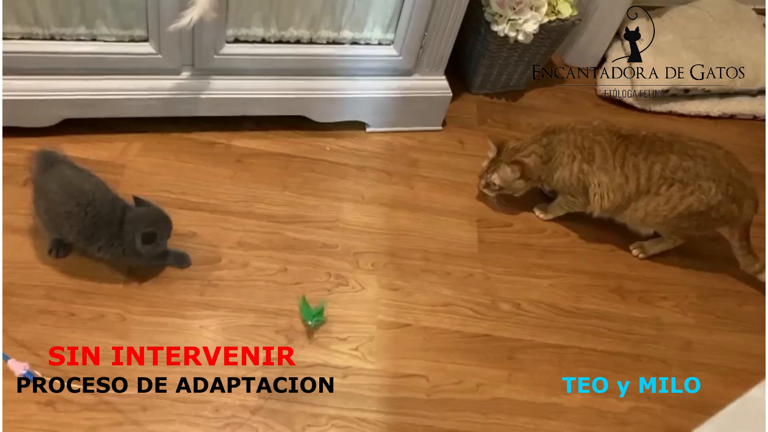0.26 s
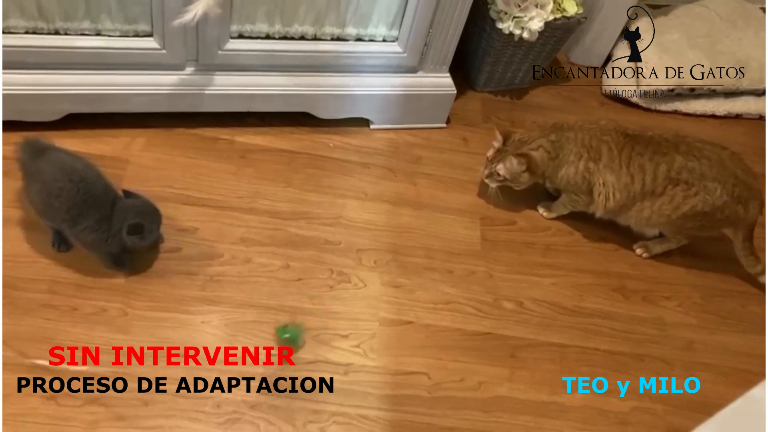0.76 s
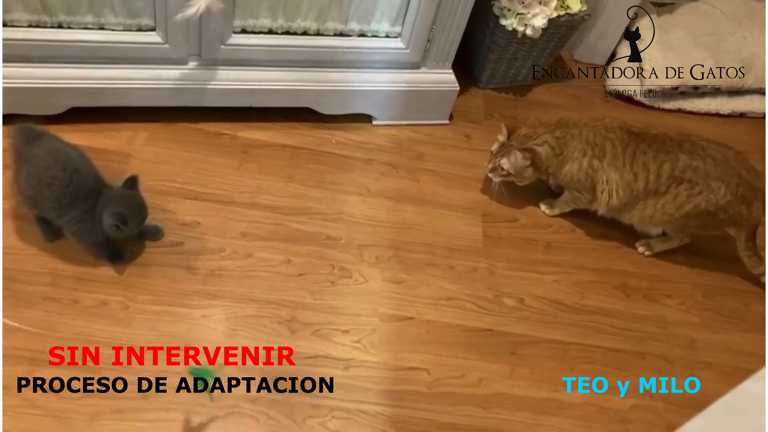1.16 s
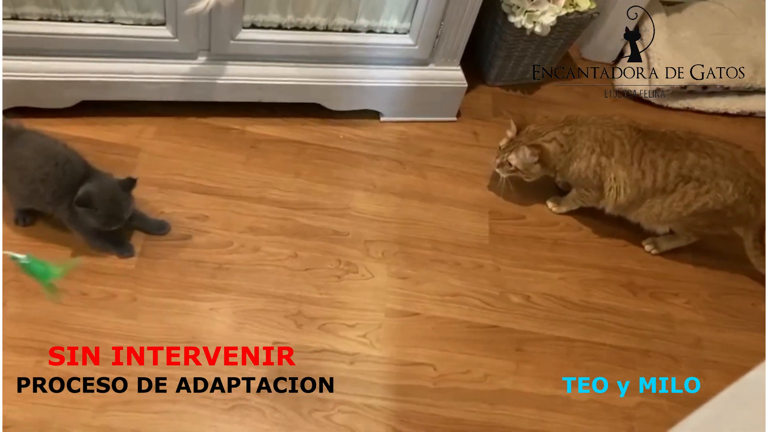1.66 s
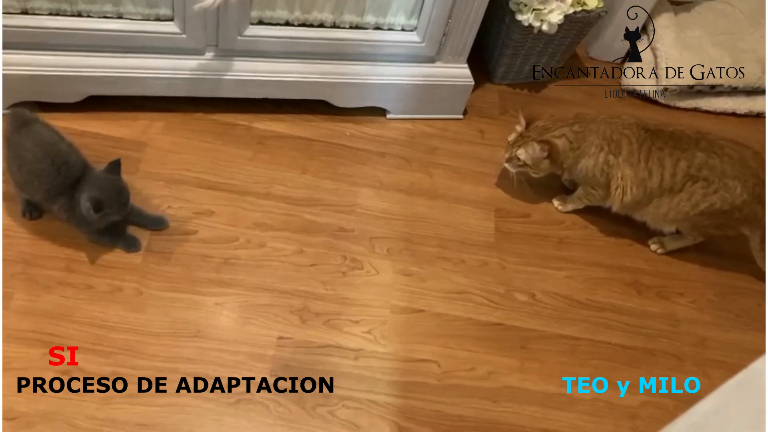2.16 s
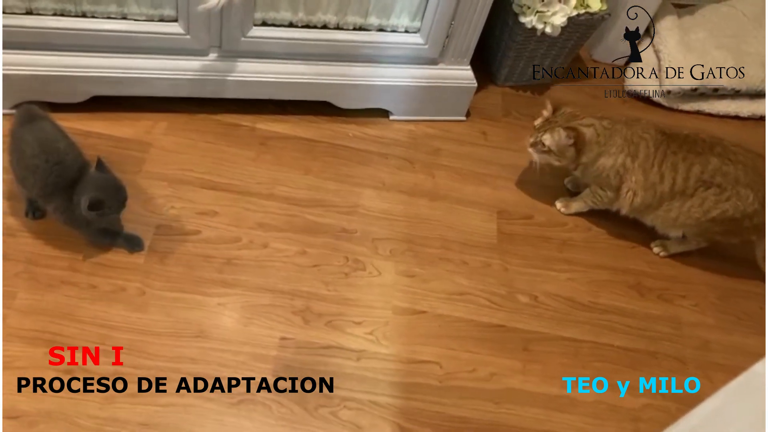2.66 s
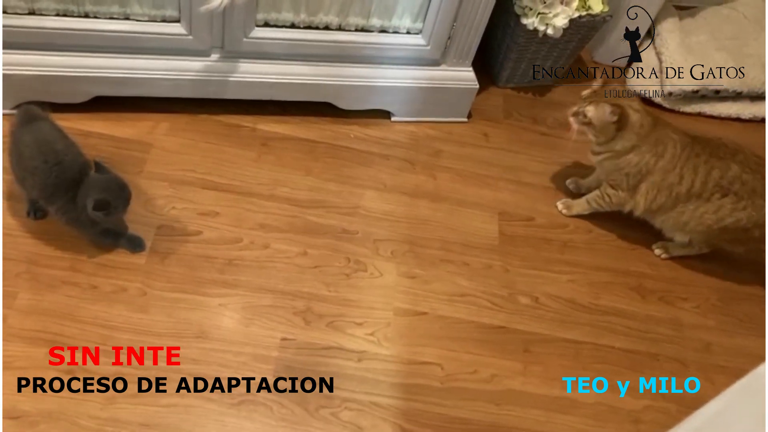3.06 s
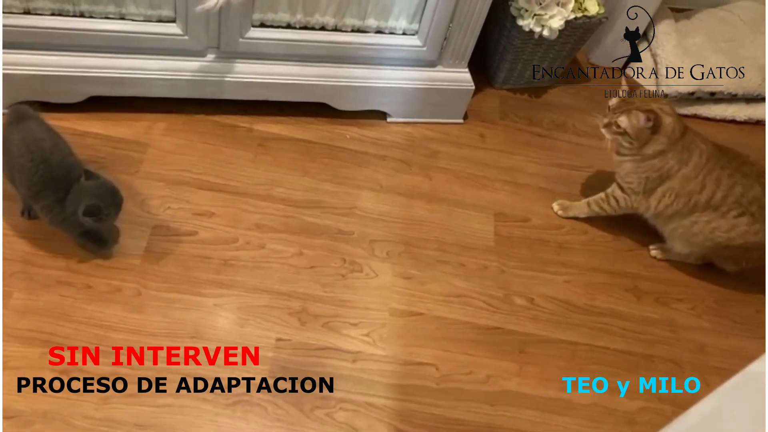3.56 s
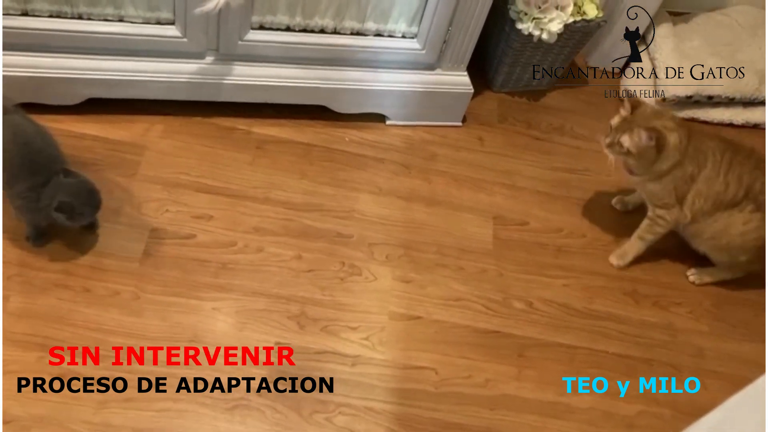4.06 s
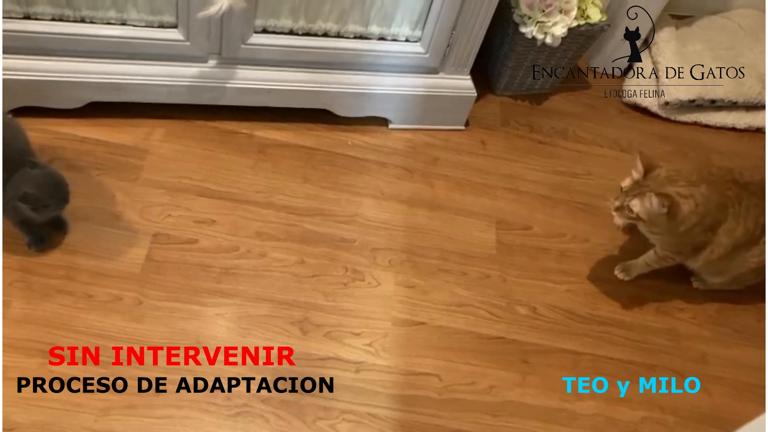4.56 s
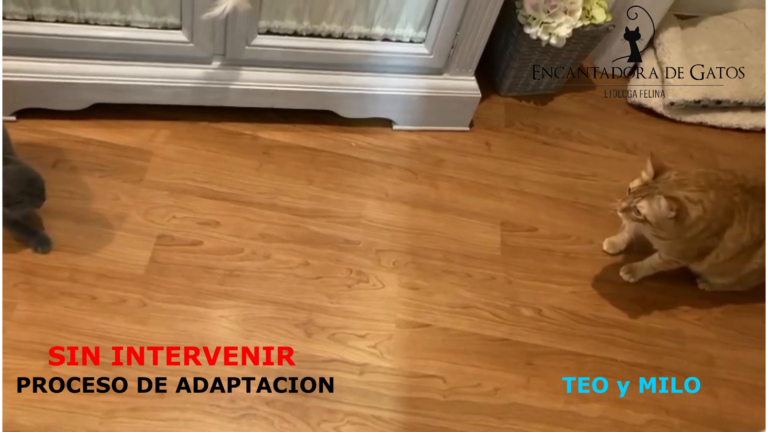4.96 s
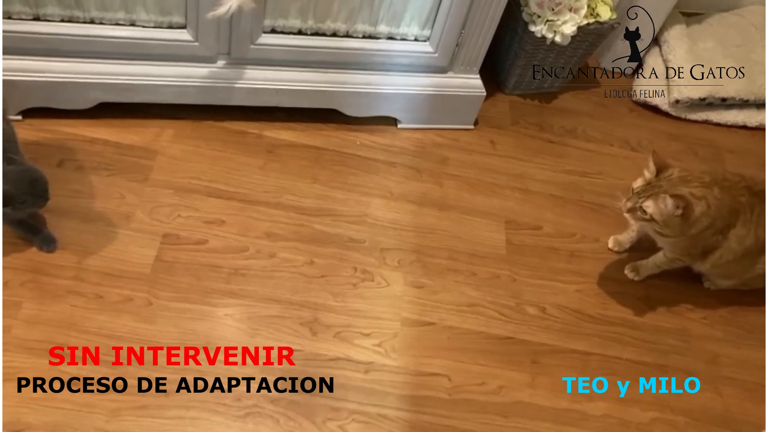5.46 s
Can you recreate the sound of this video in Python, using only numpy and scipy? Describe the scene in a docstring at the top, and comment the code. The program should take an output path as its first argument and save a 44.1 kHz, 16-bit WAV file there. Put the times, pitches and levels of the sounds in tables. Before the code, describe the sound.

Two cats confront each other indoors, heard from a few metres in stereo with a short room ring. One, slightly right of centre, gives a rising and falling yowl, pauses, then yowls again until the end. Between and beneath, the other growls deep and choppy in the centre, with two breathy snarls. Light paw scuffs, ticks and muffled footfalls sit over a quiet appliance hum and dull air noise.

```python
"""A cat gives two drawn-out warning yowls, a few metres from a stereo microphone in a wooden-floored room.
Its folds vibrate almost purely, and turn hoarse when slack, strained or gliding fast. A second cat, facing it,
keeps up a low growl, a buzz chopped by a flutter, and snarls twice, in puffs of air that ring the mouth.
Short noise bursts make the paw scuffs and ticks on the boards, decaying low tones the footfalls.
Behind them an appliance hums as wavering tones over a soft noise rush, and the room rings briefly."""
import sys
import numpy as np
from scipy import signal
from scipy.fft import rfft, irfft
from scipy.io import wavfile
from scipy.ndimage import uniform_filter1d, map_coordinates

SR = 44100
rng = np.random.default_rng(int(sys.argv[2]) if len(sys.argv) > 2 else 0)


def unload_wav(signal):
    """Save mono or channel-first audio to the path in sys.argv[1] as 16-bit WAV at rate SR, clipped to [-1, 1]."""
    wavfile.write(
        sys.argv[1],
        SR,
        np.round(np.clip(np.atleast_2d(signal).T, -1, 1) * 32767).astype(np.int16),
    )


N = 252693
TIME = np.arange(N) / SR
FREQ = np.fft.rfftfreq(N, 1 / SR)
LEFT_RIGHT = np.array([[1], [-1]])

# Source levels below are relative settings, ahead of trims, filters, panning and room.
# tone of the room's rush: (frequency [Hz], density [dB per Hz])
RUSH_TONE = [(20, -21.5), (42, -4), (85, 0.5), (125, 1.5), (200, -3), (380, -4), (600, -12), (1000, -19.5),
             (1600, -27), (2100, -37.5), (2800, -48), (4400, -35), (5500, -53.5), (8500, -37.5),
             (11000, -51)]
# stereo width of the rush: (frequency [Hz], side minus mid [dB])
RUSH_WIDTH = [(60, -18.5), (160, -18), (300, -16.5), (600, 2.5), (2000, -0.5), (4400, -9.5), (9000, -4.5)]
# tones of the appliance: (frequency [Hz], level [dB])
HUM_TONES = [(59.8, -63), (119.6, -66), (160, -67), (552, -74.5), (4382, -99)]
# soft footfalls that shake the floor: (time [s], level [dB])
FLOOR_THUDS = [(0.572, -67), (1.169, -45.5), (1.231, -44)]
# paws scuffing the boards: (time [s], level [dB], centre [Hz], rise [s], t60 [s])
PAW_SCUFFS = [(0.136, -62, 8460, 0.0023, 0.044), (0.583, -65, 8340, 0.0022, 0.17),
              (0.70, -66.5, 8600, 0.0073, 0.073), (3.201, -57.5, 9100, 0.0042, 0.27),
              (3.992, -65.5, 9100, 0.0012, 0.33), (4.07, -71.5, 8840, 0.0097, 0.63),
              (5.007, -64.5, 9480, 0.023, 0.48)]
# small ticks, perhaps claws or the toy: (time [s], level [dB], low mode [Hz], high minus low mode [dB])
SMALL_TICKS = [(2.128, -58.5, 2680, -5), (2.156, -56.5, 2620, -1), (2.184, -57, 2560, -7),
               (2.197, -50.5, 2390, -21), (3.37, -47, 2290, -39)]
# throat resonances of the growl: (frequency [Hz], width [Hz], level [dB])
GROWL_THROAT = [(300.8, 105, 5), (369.4, 30, 4), (940, 290, -20)]
# short growls under the yowls, high and low by turns:
# (start [s], length [s], top pitch [Hz], chest level [dB], throat level [dB])
SHORT_GROWLS = [(0.0, .25, 159.3, -55, -61), (1.532, 0.23, 119.7, -62.5, -72.5),
                (3.628, 0.18, 160.3, -50, -60), (4.534, 0.73, 119.3, -61.5, -68.5),
                (5.076, .65, 167.8, -55, -65.5)]
# the long growl: (time [s], pitch [Hz], chest level [dB], throat level [dB], rasp level [dB])
LONG_GROWL_PATH = [(2.12, 107.4, -67.5, -64.5, -82), (2.25, 115.5, -52.5, -58, -76),
                   (2.39, 117.3, -52, -52, -69), (2.5, 149.9, -50.5, -58, -75.5),
                   (2.62, 167.7, -57, -52, -70), (2.8, 156.2, -48.5, -57, -75.5),
                   (2.9, 144.4, -52, -50.5, -71.5), (3.02, 134.1, -55, -54.5, -72),
                   (3.18, 130.9, -55.5, -59, -68.5), (3.33, 129.6, -64.5, -55.5, -68.5),
                   (3.39, 118.2, -46.5, -54, -69.5), (3.5, 116.1, -47, -52.5, -70),
                   (3.62, 115, -56, -53, -74.5)]
# standing waves between growler and microphone: (frequency [Hz], half width [Hz], gain [dB])
GROWL_STANDING_WAVES = [(131, 18, -6.5), (163.5, 6.8, 5), (261.4, 14, 7), (313, 14, 8)]
# the two snarls: (start [s], rise [s], hold [s], release [s], level [dB],
# resonance scale [ratio], gain of the lower resonance [dB])
SNARL_EVENTS = [(2.183, 0.14, 0.05, 0.18, -63.5, 0.926, 7.5), (5.058, 0.15, 0.18, 0.19, -58, 1.0, 12)]
# mouth resonances of a snarl, ahead of its scale: (frequency [Hz], density [dB per Hz])
SNARL_RESONANCES = [(500, -22), (900, 1), (1300, -4), (1600, -10.5), (1950, 2), (2280, 3), (2440, -13),
                    (2700, -37), (3300, -41.5), (3750, -29), (4400, -15), (4600, -18), (4900, -46),
                    (5500, -54)]
# pitch of the two yowls: (time [s], pitch [Hz])
FIRST_YOWL_PITCH = [(0.1, 303.8), (0.204, 298.1), (0.264, 364), (0.338, 539.5), (0.395, 682), (0.43, 817),
                    (0.465, 847.7), (0.565, 845), (0.598, 748), (0.635, 670), (0.66, 588), (0.786, 545),
                    (0.98, 521.4), (1.076, 509), (1.15, 454.4), (1.234, 429.2), (1.346, 317.8),
                    (1.564, 214.2), (1.66, 199.6)]
SECOND_YOWL_PITCH = [(3.62, 214.4), (3.65, 246.7), (3.715, 288.3), (3.78, 400), (3.85, 512.8), (3.89, 530),
                     (3.94, 586.8), (3.99, 599), (4.05, 574), (4.32, 577.5), (4.67, 466.6), (4.72, 418.5),
                     (4.92, 406.1), (5.17, 430.5), (5.28, 436), (5.45, 496), (5.52, 509.0), (5.73, 489)]
# effort and mouth; the first starts with a catch:
# (time [s], level [dB], mouth opening as overtone gain [dB])
FIRST_YOWL_EFFORT = [(0.102, -68.5, -5.5), (0.124, -45, 1.5), (0.169, -62.5, -9), (.205, -44.5, -0.5),
                     (.27, -49.5, 2.5), (0.324, -51.5, -6.5), (0.364, -39.5, -24), (0.421, -46.5, -34),
                     (.475, -44, -37.5), (.52, -54.5, -27), (.585, -41.5, -36.5), (0.622, -42, -23.5),
                     (0.661, -43.5, -21.5), (.72, -47.5, -4.5), (.83, -58, -15), (.96, -48, -5),
                     (1.03, -55, 7.5), (1.1, -49, -5), (1.189, -37, -15.5), (1.291, -46, 1),
                     (1.4, -51.5, 3), (1.56, -56.5, 1.5), (1.66, -68, 3.5)]
SECOND_YOWL_EFFORT = [(3.62, -63.5, -8), (3.681, -56, -7.5), (3.739, -48.5, -3), (3.8, -45.5, -9.5),
                      (3.888, -51, -10), (3.95, -47, -19.5), (3.992, -47, -22.5), (4.024, -69.5, 6.5),
                      (4.3, -54.5, -2), (4.482, -41, -14.5), (4.56, -46.5, -5.5), (4.64, -46, -6.5),
                      (4.731, -47, 5), (4.87, -45, -5.5), (4.999, -45, 1), (5.128, -54, 6.5),
                      (5.26, -47, -4), (5.391, -54, -1.5), (5.47, -51, -6.5), (5.73, -48, -8.5)]
# upper harmonics: (time [s], level of the third [dB], level of the higher ones [dB])
FIRST_YOWL_UPPER = [(.1, -70.5, -92.5), (.23, -68, -92), (.33, -90, -100), (.58, -100, -105),
                    (.68, -76, -104), (.85, -81, -101), (1.03, -63.5, -98), (1.13, -69.5, -98),
                    (1.25, -74, -86.5), (1.4, -65, -80), (1.55, -62, -90), (1.66, -71, -84)]
SECOND_YOWL_UPPER = [(3.62, -80, -98), (3.729, -75, -92.5), (3.98, -87.5, -104), (4.06, -78.5, -95.5),
                     (4.17, -73.5, -84.5), (4.419, -77.5, -78), (4.53, -75, -85), (4.61, -53.5, -81),
                     (4.749, -66, -80.5), (4.95, -57.5, -86), (5.15, -67.5, -87.5), (5.4, -65.5, -92),
                     (5.55, -73, -98), (5.73, -62, -102)]
# the nearly shut mouth lets little treble out, apart from one resonance: (frequency [Hz], gain [dB])
YOWL_MOUTH = [(1200, 5), (1650, 1.5), (2000, -3.5), (2150, 0.5), (2330, 2), (2480, -5), (2650, -13),
              (2900, -17.5), (3450, -15), (4100, -13), (5000, -25.5)]
# throat rung by the air that rasps through hoarse folds: (frequency [Hz], width [Hz], level [dB])
YOWL_RASP = [(695, 180, -3.5), (1180, 300, -16)]
# standing waves that lift or swallow a yowl's gliding partials:
# (frequency [Hz], half width [Hz], gain [dB])
YOWL_STANDING_WAVES = [(276, 60, 8), (398, 7.5, -2.5), (473, 66, 2), (468.8, 8.4, 6), (502.3, 9.4, -14.5),
                       (565.3, 8.9, -15.5), (598.9, 21, 8), (700.7, 13, 6)]

TOP_HZ = 11000
AIR_DB = -56.5
RIGHT_LAG_S = .00009  # the rush reaches the right microphone this much later
SWELL_BELOW_HZ = 8700  # the rush surges mostly below this; the hiss above it is steadier
TICK_WIDTH_HZ, TICK_HIGH_HZ, TICK_HIGH_WIDTH_HZ = 450, 5520, 370
GROWL_REST_HZ, GROWL_ARCH = 120.2, 1.3
GROWL_CREST = .46  # the pitch tops out at this share of the length
GROWL_ATTACK_S, GROWL_RELEASE_S = 0.041, 0.38
CHEST_SAG_DB_PER_S, THROAT_SAG_DB_PER_S = 14.5, 0.5
GROWL_SWELL_DB = 2.5  # lift of the chest in the middle of a growl; the throat gets half
GROWL_MOUTH_HZ, GROWL_MOUTH_WIDTH_HZ = 926, 380
GROWL_SHIMMER = .18
SNARL_PULSE_HZ, SNARL_PULSE_DEPTH = 110.8, 0.48
SNARL_SHUT_DROP = .08  # share by which the resonances fall when the mouth is shut
EASY_HZ, STRAIN_HZ = 369, 650
PURITY_DB = 6.5  # loss of the second harmonic one octave above the easy pitch
ROUGH_BASE, ROUGH_PER_OCTAVE_DOWN, ROUGH_PER_OCTAVE_UP = 0.12, .6, .45
ROUGH_PER_OCTAVE_PER_S = 0.052
OVERTONE_FLICKER_DB = 2.5
HOARSE_SMEAR = 1.1  # phase wander of the second harmonic when fully hoarse [rad]; the third gets twice this
UPPER_SMEAR = 0.41  # phase wander of the higher harmonics [rad]
YOWL_FLUTTER = .7  # depth of the flutter in a fully hoarse voice
HAZE_HZ, HAZE_WIDTH_HZ = 1840, 1800  # haze of air between the higher harmonics


def undb(db):
    """Decibels to gain."""
    return 10 ** (np.asarray(db) / 20)


def unit(x):
    """Scale to rms 1."""
    return x / np.sqrt(np.mean(x ** 2))


def curves(table):
    """Each column of a time table, sample by sample."""
    s, *columns = np.transpose(table)
    return [np.interp(TIME, s, c) for c in columns]


def gate(table, fade=0.02):
    """Open while a table lasts, with short fades outside it."""
    start, end = table[0][0], table[-1][0]
    return np.interp(TIME, [start - fade, start, end, end + fade], [0, 1, 1, 0])


def colour(x, points):
    """Filter by (frequency [Hz], gain [dB]) points."""
    hz, db = np.transpose(points)
    gain = undb(np.interp(np.log(FREQ + 1), np.log(hz), db))
    return irfft(rfft(x) * gain, N)


def resonate(x, hz, width_hz):
    """A steep resonance: one two-pole band-pass, twice."""
    b, a = signal.iirpeak(min(hz, .45 * SR), hz / width_hz, fs=SR)
    return signal.lfilter(b, a, signal.lfilter(b, a, x))


def walk(rate):
    """Smooth chance of spread 1, moving mostly slower than `rate` [Hz]."""
    spectrum = rfft(rng.standard_normal(N)) * np.exp(-(FREQ / rate) ** 2)
    return unit(irfft(spectrum, N))


def turn(hz):
    """Phase of an oscillator with a moving frequency."""
    return 2 * np.pi * np.cumsum(hz) / SR


def decay(s, rise, t60):
    """Envelope of a touch at time s: a quick rise and an exponential fall."""
    age = np.maximum(TIME - s, 0)
    return (1 - np.exp(-age / rise)) * np.exp(-np.log(1000) * age / t60)


def reflections(x, t60, gap=0.0073):
    """Floor, furniture and walls: a dense, decaying train of echoes of about unit energy."""
    echoes = rng.standard_normal(N) * np.exp(-np.log(1000) * TIME / t60) * (TIME > gap)
    echoes = echoes[:SR] / np.sqrt(np.sum(echoes ** 2))
    return signal.fftconvolve(x, echoes)[:N]


def room(x, t60=0.46, centre_db=-9, wide_db=-2):
    """Direct sound and echoes at the microphone; the echoes are wide except in the bass."""
    width = [(150, -30), (300, -17.0), (420, -12.5), (560, -1.5), (850, -1.5), (1500, 2.0)]
    side = colour(reflections(x, t60), width)
    return x + undb(centre_db) * reflections(x, t60) + undb(wide_db) * side * LEFT_RIGHT


def standing_waves(x, bumps):
    """The room's narrow peaks and dips between a cat and the microphone."""
    freq = np.fft.rfftfreq(2 * N, 1 / SR)
    db = sum(gain_db * np.exp(-((freq - hz) / width) ** 2) for hz, width, gain_db in bumps)
    return irfft(rfft(x, 2 * N) * undb(db))[:N]


def background(hum_waver=0.26, swell_db=2):
    """Wavering appliance tones over the room's soft noise rush, which comes a little from the left."""
    mid = colour(rng.standard_normal(N), RUSH_TONE)
    side = colour(rng.standard_normal(N), RUSH_TONE)
    left, right = mid + colour(side, RUSH_WIDTH) * LEFT_RIGHT
    right = irfft(rfft(right) * np.exp(-2j * np.pi * FREQ * RIGHT_LAG_S), N)
    air = unit(np.array([left, right])) * undb(AIR_DB)
    rush = irfft(rfft(air) / (1 + (FREQ / SWELL_BELOW_HZ) ** 2), N)
    hum = 0
    for hz, db in HUM_TONES:
        tone = np.sqrt(2) * np.sin(turn(hz + 0.61 * walk(3.3)))
        hum = hum + undb(db) * tone * (1 + hum_waver * walk(13.0))
    return air + rush * (undb(swell_db * walk(14)) - 1) + hum


def footfalls(floor_hz=57, rise=0.017, t60=0.4):
    """The boards give a short, deep, decaying thud under a soft footfall."""
    return sum(undb(db) * np.sin(2 * np.pi * floor_hz * (TIME - s)) * decay(s, rise, t60)
               for s, db in FLOOR_THUDS)


def scuffs(width_hz=3000, catch_db=0.5, scuff_db=-9):
    """Pads and claws slide over the boards: bursts of band-passed noise, catching unevenly."""
    rubs = 0
    for s, db, hz, rise, t60 in PAW_SCUFFS:
        rub = unit(resonate(rng.standard_normal(N), hz, width_hz))
        rubs = rubs + undb(db + scuff_db) * decay(s, rise, t60) * rub
    return rubs * undb(catch_db * walk(90))


def ticks(t60=0.027, rise=0.0007, tick_db=-7):
    """Small, hard contacts ring briefly in a low mode; the sharper ones also wake a high mode."""
    contact = rng.standard_normal(N)
    high = unit(resonate(contact, TICK_HIGH_HZ, TICK_HIGH_WIDTH_HZ))
    out = 0
    for s, db, hz, high_db in SMALL_TICKS:
        low = unit(resonate(contact, hz, TICK_WIDTH_HZ))
        out = out + undb(db + tick_db) * (low + undb(high_db) * high) * decay(s, rise, t60)
    return out


def growl(hz, chest_gain, throat_gain, rasp_gain=0, flutter_hz=54, flutter_depth=0.85):
    """Slack folds buzz, chopped by a slower flutter; chest and throat ring and air rasps in the mouth."""
    beat = np.cos(turn(flutter_hz * (1 + .045 * walk(30))))
    # each beat of the flutter tightens the folds: louder and a little higher
    phase = turn(hz * (1 + .012 * walk(70) + .15 * beat))
    buzz = sum(np.cos(k * phase) / k for k in range(1, 11)) + .15 * walk(1200)
    puffs = np.exp(flutter_depth * beat + GROWL_SHIMMER * walk(60))
    chest = unit(resonate(buzz * puffs, 137.8, 64))
    throat = unit(sum(undb(db) * resonate(buzz * puffs, f, width) for f, width, db in GROWL_THROAT))
    air = puffs * (1 + np.cos(phase)) * rng.standard_normal(N)
    rasp = unit(resonate(air, GROWL_MOUTH_HZ, GROWL_MOUTH_WIDTH_HZ))
    return chest_gain * chest + throat_gain * throat + rasp_gain * rasp


def growl_controls():
    """Pitch, chest gain and throat gain: each short growl swells, arches up in pitch and sinks as it tires."""
    hz, chest, throat = GROWL_REST_HZ, 0, 0
    for start, length, top_hz, chest_db, throat_db in SHORT_GROWLS:
        age = np.maximum(TIME - start, 0)
        attack = np.clip(age / GROWL_ATTACK_S, 0, 1)
        held = attack * np.clip(1 + (length - age) / GROWL_RELEASE_S, 0, 1)
        crest = age / (GROWL_CREST * length)
        arch = (crest * np.exp(1 - crest)) ** GROWL_ARCH
        swell_db = GROWL_SWELL_DB * np.sin(np.pi * np.minimum(age / length, 1)) ** 2
        hz = hz + (top_hz - GROWL_REST_HZ) * arch
        chest_now_db = chest_db + swell_db - CHEST_SAG_DB_PER_S * age
        throat_now_db = throat_db + swell_db / 2 - THROAT_SAG_DB_PER_S * age
        chest = np.maximum(chest, held * undb(chest_now_db))
        throat = np.maximum(throat, held * undb(throat_now_db))
    return hz, chest, throat


def long_growl():
    """One unbroken growl between the yowls: its pitch climbs, then sags slowly back."""
    hz, *levels_db = curves(LONG_GROWL_PATH)
    return growl(hz, *undb(levels_db) * gate(LONG_GROWL_PATH))


def snarls(uneven=0.202, catch_db=2):
    """Uneven puffs of air past slack folds ring the mouth, its resonances moving as it opens and shuts."""
    pulse = np.cos(turn(SNARL_PULSE_HZ * (1 + uneven * walk(69))))
    puffs = np.exp(SNARL_PULSE_DEPTH * pulse) * undb(catch_db * walk(45))
    air, out = puffs * rng.standard_normal(N), 0
    for start, rise, hold, release, db, scale, low_db in SNARL_EVENTS:
        mouth = colour(air, [(hz * scale, gain_db) for hz, gain_db in SNARL_RESONANCES])
        mouth = colour(mouth, [(1300, low_db), (1800, 0.002)])
        shut = np.minimum(((TIME - start - rise - hold / 4) / release) ** 2, 1)
        # reading the sound more slowly lowers its resonances
        mouth = map_coordinates(mouth, [np.cumsum(1 - SNARL_SHUT_DROP * shut)], mode="mirror")
        corners = start + np.cumsum([0, rise, hold, release])
        envelope = np.interp(TIME, corners, [0, 1, 1, 0]) ** 2
        out = out + undb(db) * envelope * unit(mouth)
    return out


def hoarseness(octaves):
    """Roughness 0-1 from octaves above the easy pitch: slack folds, strained folds and fast glides."""
    glide = np.abs(uniform_filter1d(np.gradient(octaves) * SR, size=2205))
    strain = np.maximum(octaves - np.log2(STRAIN_HZ / EASY_HZ), 0)
    slack = np.maximum(-octaves, 0)
    rough = ROUGH_BASE + ROUGH_PER_OCTAVE_DOWN * slack + ROUGH_PER_OCTAVE_UP * strain
    return np.clip(rough + ROUGH_PER_OCTAVE_PER_S * glide, 0, 1)


def yowl(pitch, effort, upper_level, second_db, waver=0.0046, jitter=0.065, shimmer=0.77,
         flutter_hz=66, flicker_db=4.0, upper_step_db=-3, haze_db=-4):
    """Nearly pure fold vibration; when hoarse, cycles grow uneven, a flutter joins and air rasps through."""
    hz, = curves(pitch)
    level_db, mouth_db = curves(effort)
    third_db, upper_db = curves(upper_level)
    octaves = np.log2(hz / EASY_HZ)
    rough = hoarseness(octaves)
    phase = turn(hz * (1 + waver * walk(36) + jitter * rough * walk(170)))
    # the second harmonic weakens above the easy pitch
    overtone_db = second_db + mouth_db - PURITY_DB * np.maximum(octaves, 0) ** 2
    second_gain = undb(overtone_db + OVERTONE_FLICKER_DB * walk(27))
    second = second_gain * np.sin(2 * phase + HOARSE_SMEAR * rough * walk(73))
    third_gain = undb(third_db + OVERTONE_FLICKER_DB * walk(27))
    third = third_gain * np.sin(3 * phase + 2 * HOARSE_SMEAR * rough * walk(91))
    # weak higher harmonics come and go in a haze of air that is let through once a cycle
    air = rng.standard_normal(N) * (1 + np.cos(phase))
    harmonics = 0
    for i, k in enumerate(range(4, 8)):
        gain = undb(upper_step_db * i + flicker_db * walk(25))
        harmonics = harmonics + gain * np.sin(k * phase + UPPER_SMEAR * walk(64))
    haze = undb(haze_db) * unit(resonate(air, HAZE_HZ, HAZE_WIDTH_HZ))
    upper = colour(undb(upper_db) * (harmonics + haze), YOWL_MOUTH)
    rasp = rough ** 2 * sum(undb(db) * unit(resonate(air, f, width)) for f, width, db in YOWL_RASP)
    tones = undb(level_db) * (np.sin(phase) + second) + third + upper
    voice = np.sqrt(2) * tones + undb(level_db) * rasp
    flutter = np.sin(turn(flutter_hz * (1 + 0.12 * walk(21))))
    uneven = shimmer * walk(47) + YOWL_FLUTTER * flutter
    return voice * (1 + rough * uneven) * gate(pitch, fade=0.0042)


def scene(first_db=-2.5, second_db=0.0, first_pan_db=-0.9, second_pan_db=-1.5):
    """The yowls sit right of centre, the second further right and drier; the growler is in the centre."""
    paws = room(ticks() + scuffs(), t60=0.1, centre_db=-6, wide_db=-6.5) + footfalls()
    growls = standing_waves(long_growl() + growl(*growl_controls()), GROWL_STANDING_WAVES)
    growler = room(growls, t60=0.68, centre_db=-9, wide_db=-0.5)
    growler = growler + room(snarls(), t60=0.078, centre_db=-3.0, wide_db=-5.5)
    first = yowl(FIRST_YOWL_PITCH, FIRST_YOWL_EFFORT, FIRST_YOWL_UPPER, second_db=-1.5)
    first = room(standing_waves(first, YOWL_STANDING_WAVES), centre_db=-7.5)
    second = yowl(SECOND_YOWL_PITCH, SECOND_YOWL_EFFORT, SECOND_YOWL_UPPER, second_db=0.5)
    second = room(standing_waves(second, YOWL_STANDING_WAVES), centre_db=-9.5)
    # a negative pan lowers the left and lifts the right
    yowls = first * undb(first_db + first_pan_db * LEFT_RIGHT / 2)
    yowls = yowls + second * undb(second_db + second_pan_db * LEFT_RIGHT / 2)
    return background() + paws + growler + yowls


def record(dry):
    """The recorder cuts the top with a steep low-pass."""
    low_pass = signal.ellip(10, .2, 70, TOP_HZ, fs=SR, output="sos")
    return signal.sosfilt(low_pass, dry)


dry = scene()
out = record(dry)
unload_wav(out)
```